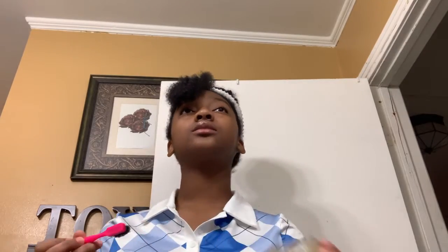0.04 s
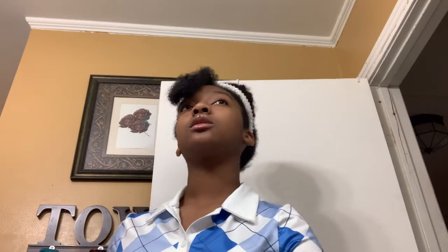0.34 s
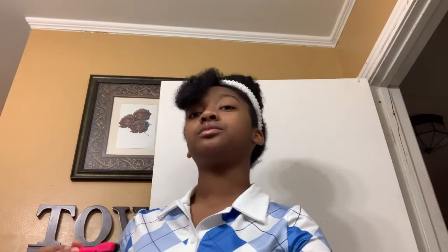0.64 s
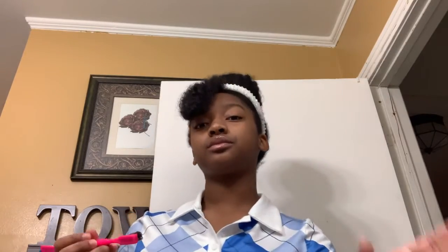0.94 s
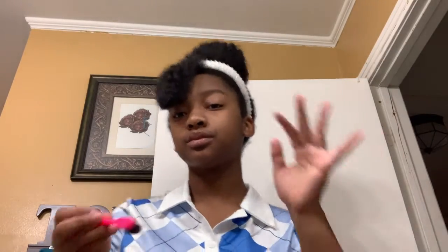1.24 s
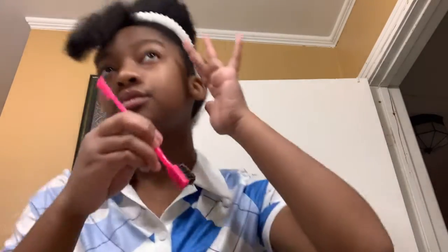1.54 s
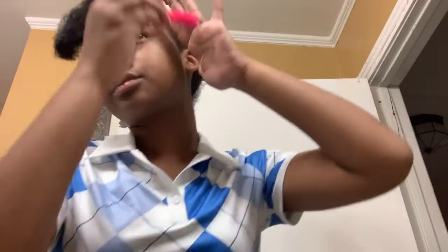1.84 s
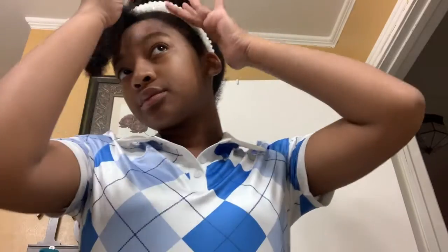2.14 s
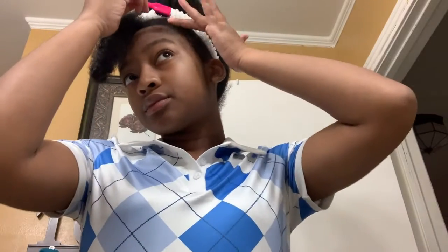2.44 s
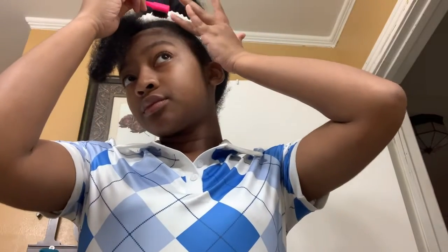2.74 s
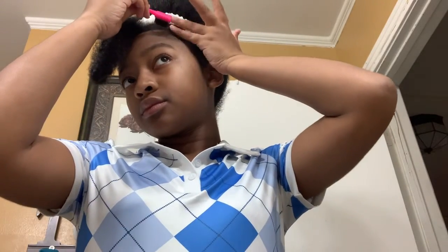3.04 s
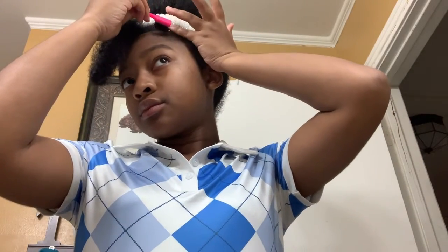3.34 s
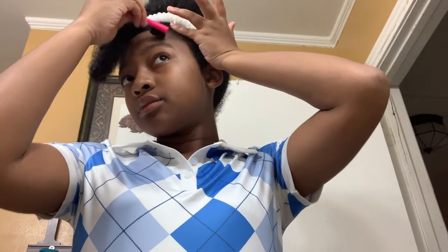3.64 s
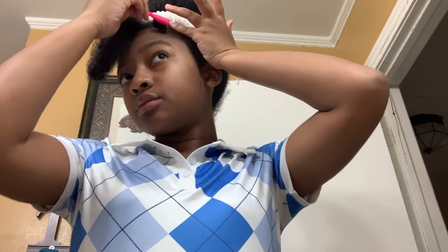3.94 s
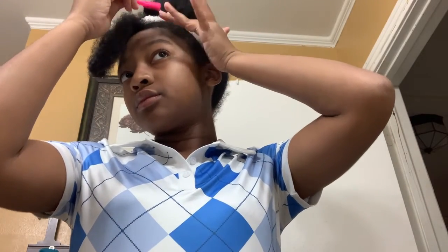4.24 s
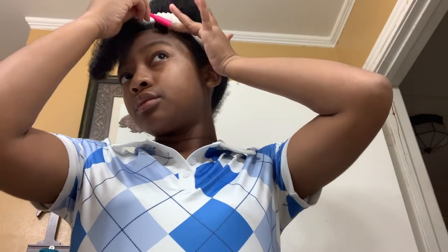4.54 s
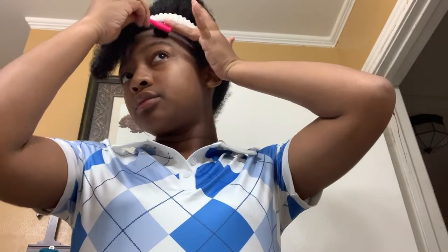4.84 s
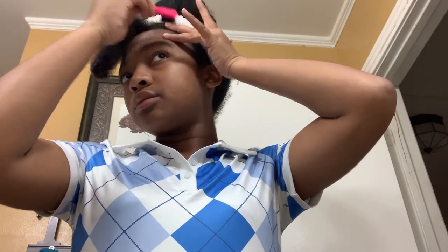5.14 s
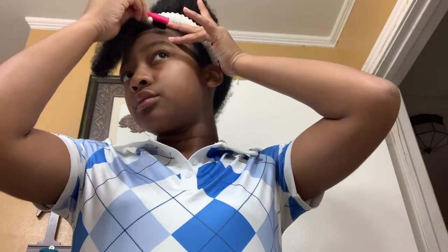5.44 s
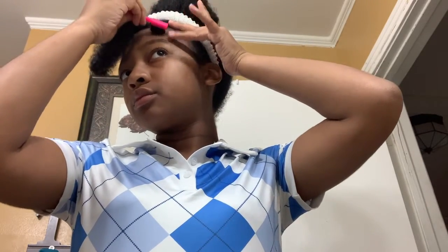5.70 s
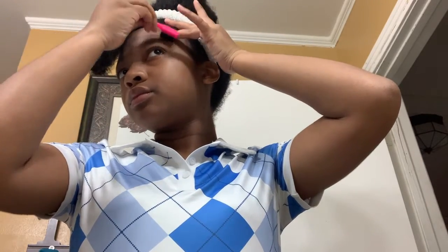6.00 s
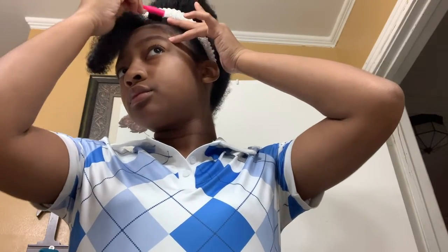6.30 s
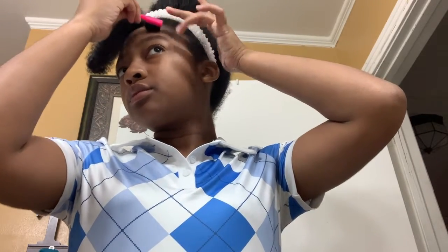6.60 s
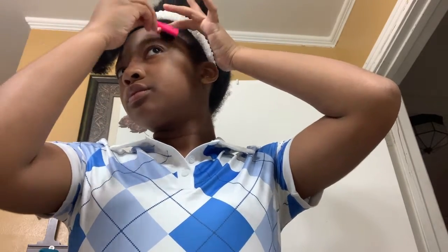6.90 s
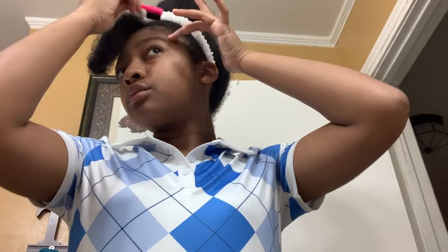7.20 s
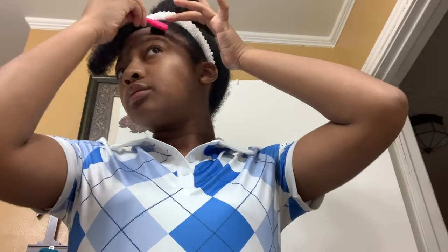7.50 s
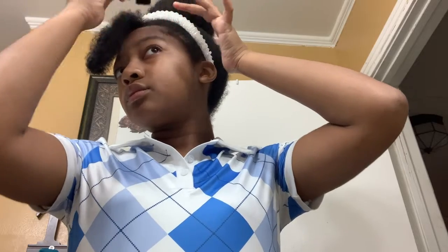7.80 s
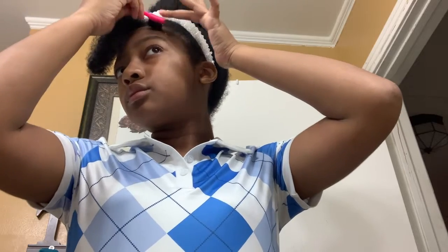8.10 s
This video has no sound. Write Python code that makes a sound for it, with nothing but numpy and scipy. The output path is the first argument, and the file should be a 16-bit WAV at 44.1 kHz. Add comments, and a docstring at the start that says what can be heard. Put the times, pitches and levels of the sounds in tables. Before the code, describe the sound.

One loud, sharp knock of a jar set down, then faint scratchy hair brushing and light taps over a low fan hum.

```python
"""Jar knock and hair brushing in a small room

A ventilation fan rushes and keeps the room's low resonances humming. A plastic jar is set down hard
on the counter: a crack, then jar and counter ring. Sleeves and hands rustle, things in the hands tap
lightly, and a small bristle brush flicks and drags over hair in tiny fibre slips.
Two close microphone ports hear it all; the knock overloads them."""
import sys
import numpy as np
from scipy import signal
from scipy.fft import rfft, irfft, next_fast_len
from scipy.io import wavfile
from scipy.ndimage import uniform_filter1d

SR = 44100
rng = np.random.default_rng(int(sys.argv[2]) if len(sys.argv) > 2 else 0)


def wav_record(signal):
    """Record a signal, one row per channel, as 16-bit PCM in the file named by sys.argv[1]."""
    frames = np.transpose(np.atleast_2d(signal))
    bounded = np.clip(frames, -1, 1)
    # unit amplitude maps onto the largest positive 16-bit level
    quanta = np.round(bounded * 32767).astype(np.int16)
    wavfile.write(sys.argv[1], SR, quanta)


N = 364045


def amp(db):
    """Decibels to gain."""
    return 10 ** (np.asarray(db) / 20)


def unit(x):
    """Scale to rms 1."""
    return x / np.sqrt(np.mean(x ** 2) + 1e-20)


def along(points, hz):
    """Read a curve of (f/Hz, value) points on a log-frequency axis."""
    f, v = np.transpose(points)
    return np.interp(np.log(hz + 1), np.log(f + 1), v)


def filtered(x, response):
    """Pass x through a frequency response."""
    n = x.shape[-1]
    m = next_fast_len(n + 8192)
    return irfft(rfft(x, m) * response(np.fft.rfftfreq(m, 1 / SR)), m)[..., :n]


def coloured(x, spectrum):
    """EQ x with (f/Hz, level/dB) points, at rms 1."""
    return unit(filtered(x, lambda hz: amp(along(spectrum, hz))))


def band(x, centre_hz, octaves):
    """Pass x through a bell on the log-frequency axis, at rms 1."""
    return unit(filtered(x, lambda hz: 1 / (1 + (np.log2((hz + 1) / centre_hz) / octaves) ** 2 / 2) ** 2))


def add(track, s, sound):
    """Mix a sound in at time s."""
    part = track[..., max(round(s * SR), 0):][..., :sound.shape[-1]]
    part += sound[..., :part.shape[-1]]


def resonant(modes):
    """Noise ringing in (f/Hz, width/Hz, level/dB) resonances, at rms 1."""
    response = lambda hz: sum(amp(db) / (1 + ((hz - centre) / width) ** 2) for centre, width, db in modes)
    return unit(filtered(rng.standard_normal(N), response))


def steadied(x):
    """Keep the quick beating of x but even out its slow swells."""
    return x / np.sqrt(np.abs(uniform_filter1d(x ** 2, size=SR // 5)) + 1e-6)


def fan(mid_db=-37, side_db=-48, drone_db=-1, boom_db=-40, mains_db=-50, mains_hz=60, lean_db=0.25):
    """Rushing air, the room resonances that it feeds, and a weak mains hum."""
    # air noise common to both ports: f/Hz, relative level/dB
    mid_eq = [(25, -37), (36, -30.5), (52, -9), (80, -11), (94, -13.5), (125, -11), (230, -13.5),
              (350, -20), (490, -26.5), (650, -41), (1000, -38.5), (1650, -46), (2300, -59.5), (3700, -62),
              (4800, -70), (15000, -69)]
    # air noise that differs between the ports: f/Hz, relative level/dB
    side_eq = [(25, -38), (55, 3.5), (90, 5), (180, 6), (450, 1), (640, -8), (770, -1), (900, -13.5),
               (1700, -17.5), (2300, -26.5), (3700, -35), (4800, -39.5), (15000, -46)]
    # weaker room resonances: f/Hz, width/Hz, relative level/dB
    boom_modes = [(80, 1.9, 4), (126.2, 4, -4), (183.8, 3, 2.5), (226.6, 21, -9), (254.4, 1.2, -4),
                  (279.3, 3.8, -4), (345.4, 9.1, -4), (371.7, 3.3, -8), (437.4, 5.3, -9.5)]
    # slow swell of the two strongest resonances: t/s, relative drone level/dB, hum level/dB
    swell = [(0, -37.5, -31), (1.4, -37.5, -39), (2.6, -35.5, -36), (3.2, -40, -39), (3.95, -30, -33.5),
             (4.3, -44.5, -30), (4.6, -33.5, -36.5), (5.1, -36.5, -32), (6.2, -38, -34.5),
             (7.1, -35, -37.5), (7.45, -33.5, -34.5), (8.25, -37, -33.5)]
    drone_modes, hum_modes = [(67.3, 4.1, 0)], [(155.1, 6.1, 0.0041), (164.4, 4.8, 0.00049)]
    t = np.arange(N) / SR
    s, drone_swell, hum_swell = np.transpose(swell)
    mid = amp(mid_db) * coloured(rng.standard_normal(N), mid_eq)
    mid += amp(boom_db) * resonant(boom_modes)
    mid += amp(drone_db + np.interp(t, s, drone_swell)) * steadied(resonant(drone_modes))
    mid += amp(np.interp(t, s, hum_swell)) * steadied(resonant(hum_modes))
    side = amp(side_db) * coloured(rng.standard_normal(N), side_eq)
    side += amp(mains_db) * np.sin(2 * np.pi * mains_hz * t)
    return np.array([mid + side, mid - side]) * amp([[-lean_db], [lean_db]])


def fibre_slips(size, per_second, hiss):
    """Tiny random slips of single fibres over a smooth hiss, in stereo."""
    slips = (rng.random(size) < per_second / SR) * rng.standard_normal((2, size))
    return unit(slips) + hiss * rng.standard_normal((2, size))


def brush(gain_db=2, attack_s=0.0041, whistle_octaves=0.3, scratch_db=-12, scratch_hz=5500):
    """Bristles bite quickly and fade as they leave the hair: a whistle over a broad scratch."""
    # flicks over hair: t/s, relative level/dB, whistle f/Hz, length/s
    flicks = [(.147, -61.5, 11000, .09), (.212, -61, 5940, .044), (1.84, -57, 2200, 0.049),
              (2.078, -55, 12200, .03), (3.138, -65, 12500, .045), (3.41, -69, 8200, .055),
              (3.556, -68, 10300, .09), (3.93, -60.5, 8600, .05), (4.016, -74.5, 7000, 0.073),
              (4.352, -75, 5140, 0.034), (4.459, -54, 7840, .04), (4.685, -56.5, 11570, .049),
              (4.896, -65.5, 8200, 0.086), (5.203, -61, 2060, 0.097), (5.245, -64.5, 3580, .06),
              (6.814, -60, 3080, .046), (6.986, -52, 6300, .03), (7.765, -61, 3500, 0.039),
              (7.785, -55, 1970, 0.037), (7.826, -53, 8060, 0.055)]
    out, t = np.zeros((2, N)), np.arange(SR // 3) / SR
    for s, db, hz, length in flicks:
        pressure = (1 - np.exp(-t / attack_s)) * np.exp(-(t / length) ** 2)
        slips = fibre_slips(len(t), per_second=2200, hiss=0.78)
        whistle = band(slips, hz, whistle_octaves)
        scratch = amp(scratch_db) * band(slips, scratch_hz, octaves=1)
        add(out, s, amp(gain_db + db) * pressure * (whistle + scratch))
    return out


def taps(click_db=-12, click_hz=2800, click_t60=.05):
    """Small damped contacts: each rings in its own colour under a broad click."""
    # things tapping in the hands: t/s, level/dB, f/Hz, width/octaves, t60/s
    contacts = [(.187, -49, 10000, .9, .035), (.216, -54, 4400, .3, 0.052), (.245, -39, 3930, .1, 0.0249),
                (1.283, -44, 980, .68, .16), (1.841, -44.5, 1000, .5, 0.13), (5.366, -47, 1380, .8, 0.41),
                (7.424, -50, 1020, .19, 0.4), (7.906, -37, 1540, 0.32, 0.13)]
    out, t = np.zeros((2, N)), np.arange(SR // 3) / SR
    for s, db, hz, octaves, t60 in contacts:
        ring = amp(-60 * t / t60) * band(rng.standard_normal((2, len(t))), hz, octaves)
        click_noise = band(rng.standard_normal((2, len(t))), click_hz, octaves=.9)
        click = amp(click_db - 60 * t / click_t60) * click_noise
        add(out, s, amp(db) * (ring + click))
    return out


def jar(land_s=0.44, ring_db=0.5, crack_db=-5, crack_t60=0.029, wet_db=-6, ring_send_db=-11):
    """The jar's base lands on the counter: a hard crack, then both ring and the room answers."""
    # modes of jar and counter: f/Hz, relative level/dB, t60/s
    modes = [(125, -15, .07), (158, -7, .1), (190, -11, .08), (247, -18, .42), (286, -27, .2),
             (495, -11, .14), (594, -19, .17), (735, -22, .15), (789, -23, .12), (873, -14, .07),
             (907, -7, .1), (955, -2, .04), (1020, -10, .12), (1058, -14, .13), (1084, -17, .22),
             (1160, -18, .15), (1357, -13, .16), (1764, -19, .14), (1940, -18, .12), (2141, -14, .12),
             (2551, -29, .16), (3313, -26, .1), (3635, -25, .09), (5050, -25, .06)]
    # colour of the hard contact: f/Hz, relative level/dB
    crack_eq = [(100, -21.5), (450, -20), (680, -31), (850, -25.5), (1080, 6), (1450, -2), (2050, -1),
                (2350, -17), (2800, -14), (3600, -10.5), (4300, -18), (5000, -14), (6200, -20),
                (8000, -23.5), (15000, -30.5)]
    thud_delay_s, port_lag_s, build_cycles = .005, .00027, 0.53
    t = np.arange(SR // 2) / SR
    ring = np.zeros(len(t))
    for hz, db, t60 in modes:
        # low bending waves travel slowly through the counter, so the thud trails the clack
        age = np.maximum(t - thud_delay_s * modes[0][0] / hz, 0)
        attack = 1 - np.exp(-age * hz / build_cycles)
        ring += amp(ring_db + db - 60 * age / t60) * attack * np.sin(2 * np.pi * hz * age)
    # the counter radiates little below its lowest mode
    ring = signal.sosfilt(signal.butter(2, 85, "highpass", fs=SR, output="sos"), ring)
    # the jar stands to the right, so the left port hears it later
    ring = filtered(ring, lambda hz: np.exp(1j * np.pi * hz * port_lag_s * np.array([[-1], [1]])))
    crack = amp(crack_db - 60 * t / crack_t60) * coloured(rng.standard_normal((2, len(t))), crack_eq)
    contact, body = np.zeros((2, 2, N))
    add(contact, land_s, crack)
    add(body, land_s, ring)
    reverb = room(contact + amp(ring_send_db) * body, build_s=.004)
    # long waves reach both ports alike
    reverb[0] += filtered(reverb[1] - reverb[0], lambda hz: 1 / (1 + (hz / 450) ** 4))
    return contact + body + amp(wet_db) * reverb


def patchy(x, depth_db):
    """Fibres catch in bunches: patches of gain a few hundred Hz wide and tens of ms long."""
    spectra = signal.stft(x, nperseg=512)[2]
    patches = uniform_filter1d(rng.standard_normal(spectra.shape[1:]), size=5, axis=0)
    patches = uniform_filter1d(patches, size=7, axis=1)
    return unit(signal.istft(spectra * amp(depth_db * unit(patches)), nperseg=512)[1][:, :N])


def rubbing(body_db=3, roundness=1.9):
    """Hand and brush drag over hair and cloth: dense fibre slips swell and fade with their speed."""
    # body of the rustle: f/Hz, relative level/dB
    body_eq = [(300, -29.5), (1000, 0.5), (2000, -0.5), (3800, 3), (5000, -3.5), (7500, -4), (9500, -23.5),
               (12000, -14.5)]
    # fizz on top: f/Hz, relative level/dB
    fizz_eq = [(3000, -22), (7000, -12), (10500, -6.5), (15500, -14.5)]
    # strokes: fastest moment t/s, relative level/dB, rise/s, fall/s, fizz boost/dB
    drags = [(.61, -54.5, .05, .11, -2.5), (.89, -66.5, .015, .05, 3), (1.0, -58.5, .04, .04, -3),
             (1.275, -61, .04, .11, 1.5), (1.56, -62.5, .08, .09, -1), (1.81, -64.5, .03, .14, -0.5),
             (2.23, -65, 0.086, .06, -0.5), (5.375, -55.5, .02, .08, -5.5), (5.69, -61, 0.11, .1, -5),
             (5.81, -62.5, 0.095, .055, 2), (6.36, -59.5, .05, .12, -5.5), (6.92, -63, .09, .1, -1),
             (7.115, -50.5, 0.043, .04, 6.5), (7.165, -47.5, 0.03, .045, -3), (7.3, -61.5, .12, .22, 2.5),
             (7.73, -62, .06, .08, 0.5), (7.92, -63, .06, .11, -1), (8.229, -68, .02, .05, -0.5)]
    t = np.arange(N) / SR
    body = patchy(coloured(fibre_slips(N, per_second=1500, hiss=1.6), body_eq), depth_db=2)
    fizz = patchy(coloured(fibre_slips(N, per_second=830, hiss=1.2), fizz_eq), depth_db=1)
    body_power, fizz_power = np.zeros((2, N))
    for s, db, rise, fall, boost_db in drags:
        from_peak = np.abs(t - s) / np.where(t < s, rise, fall)
        speed = np.exp(-from_peak ** roundness)  # roundness 1 is pointed, 2 is a bell
        body_power += amp(db + body_db) ** 2 * speed
        fizz_power += amp(db + boost_db) ** 2 * speed
    return np.sqrt(body_power) * body + np.sqrt(fizz_power) * fizz


def room(x, build_s):
    """Diffuse reverb off the walls: it fades in, then each frequency dies at its own speed."""
    # decay of the room: f/Hz, t60/s
    decay = [(100, .4), (500, 0.61), (1200, 0.4), (4000, 0.35), (12000, 0.13)]
    hz, t, spectra = signal.stft(rng.standard_normal((2, SR // 2)), SR, nperseg=256)
    tail = signal.istft(spectra * amp(-60 * t / along(decay, hz)[:, None]), SR, nperseg=256)[1]
    tail *= 1 - np.exp(-(np.arange(tail.shape[1]) / SR / build_s) ** 2)
    return signal.fftconvolve(x, tail / np.linalg.norm(tail[0]), axes=1)[:, :N]


def scene(tap_send_db=-8, brush_send_db=-4):
    """Fan, jar and hands in one room; the taps are closer than the brush, so drier."""
    tapping, brushing = taps(), brush()
    reverb = room(amp(tap_send_db) * tapping + amp(brush_send_db) * brushing, build_s=0.0063)
    return fan() + jar() + rubbing() + tapping + brushing + reverb


def record(dry, top_hz=15800):
    """The ports fall out of phase in two narrow bands and clip at full scale; the very top is cut."""
    # out-of-phase bands: f/Hz, width/Hz, level of the ports' sum/dB
    notches = [(9420, 530, -18), (13300, 520, -44.5)]
    mid_gain = lambda hz: amp(sum(db * np.exp(-((hz - f) / width) ** 4) for f, width, db in notches))
    mid = filtered((dry[0] + dry[1]) / 2, mid_gain)
    side = filtered((dry[0] - dry[1]) / 2, lambda hz: np.sqrt(2 - mid_gain(hz) ** 2))
    clipped = np.clip([mid + side, mid - side], -1, 1)
    return filtered(clipped, lambda hz: np.clip((top_hz - hz) / 200 + .5, 0, 1))


dry = scene()
out = record(dry)
wav_record(out)
```